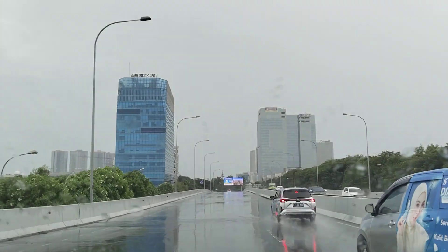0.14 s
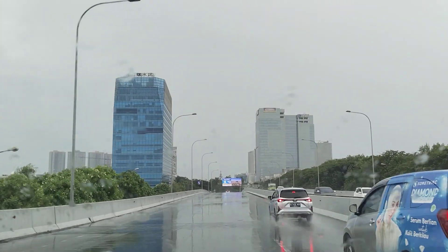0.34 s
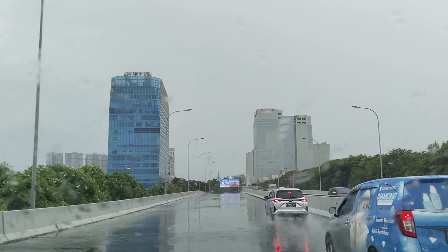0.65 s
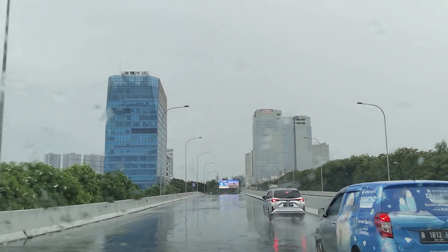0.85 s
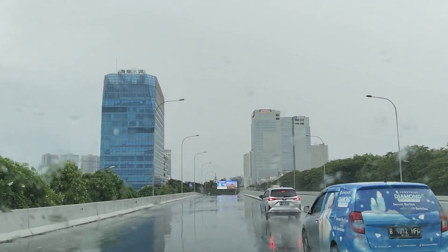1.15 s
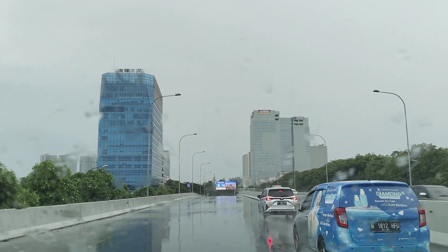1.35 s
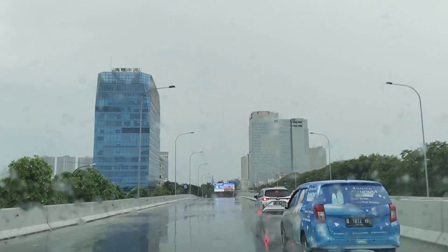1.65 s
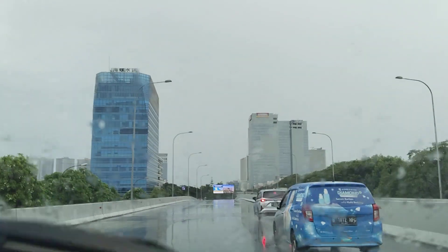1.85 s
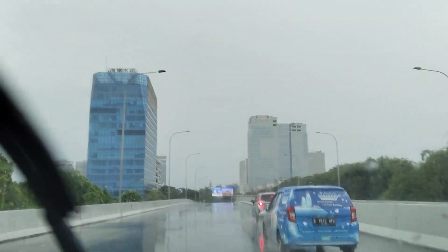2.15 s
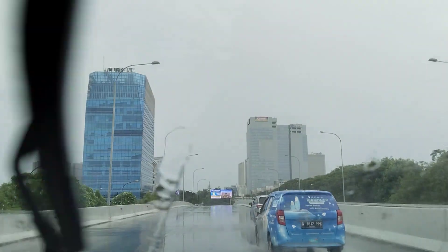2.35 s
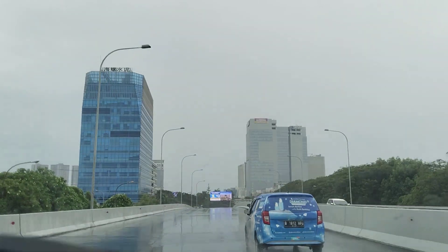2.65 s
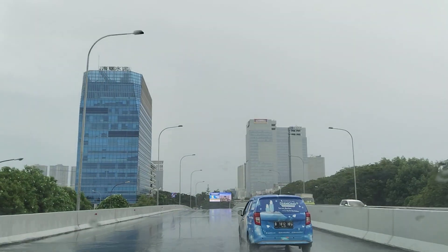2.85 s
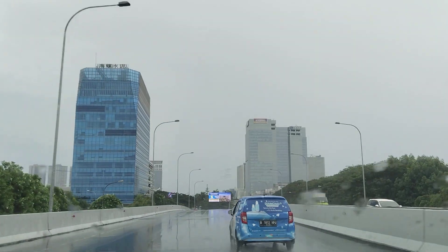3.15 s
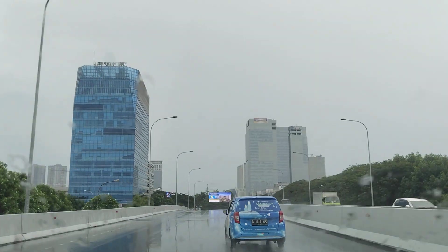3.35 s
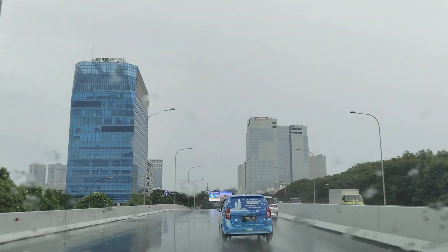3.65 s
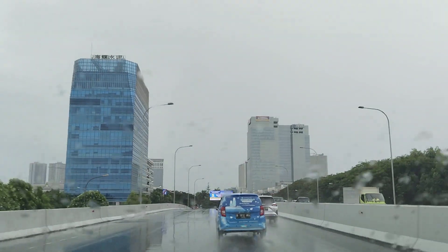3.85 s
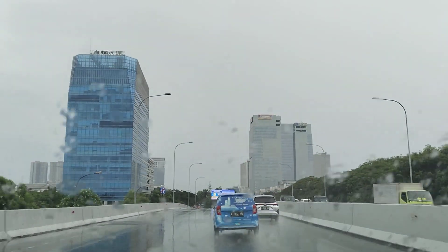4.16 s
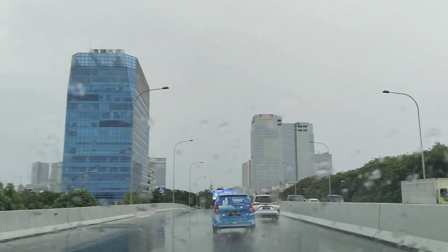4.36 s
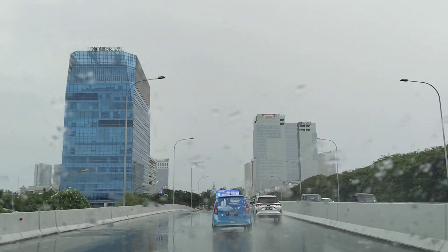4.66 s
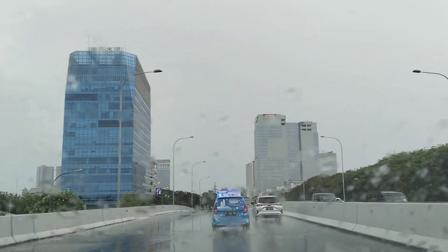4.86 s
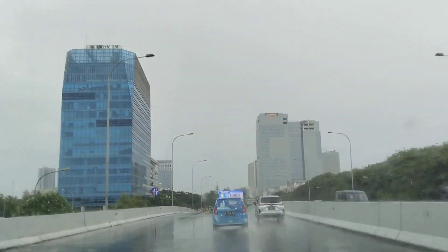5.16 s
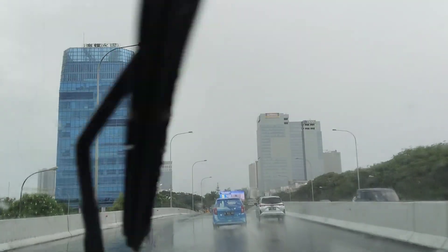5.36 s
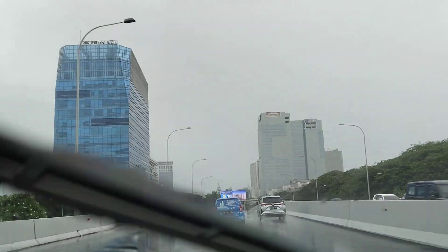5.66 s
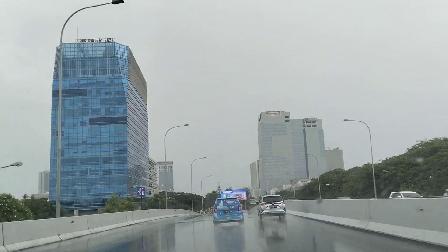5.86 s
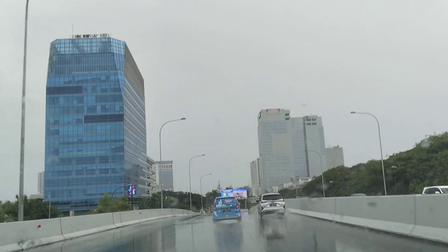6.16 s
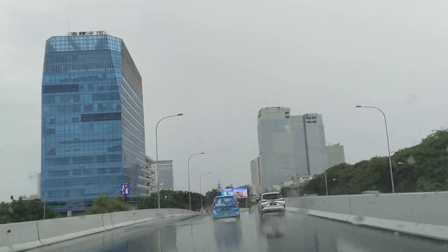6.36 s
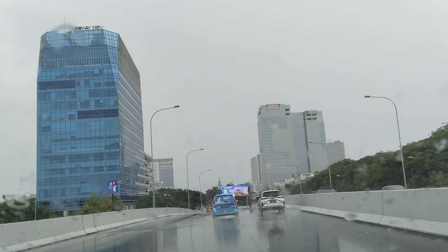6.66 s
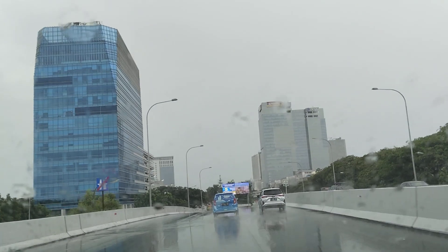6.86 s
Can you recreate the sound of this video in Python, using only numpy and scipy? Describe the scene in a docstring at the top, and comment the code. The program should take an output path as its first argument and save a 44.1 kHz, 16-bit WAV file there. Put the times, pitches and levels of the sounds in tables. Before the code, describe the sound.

Inside a moving car in the rain, a low engine drone slowly sinks in pitch beneath uneven, bassy road rumble and soft tyre roar. Fine spray hisses while sharp drops tick irregularly on the glass. Around two seconds a wiper thumps, sweeps water and squeaks briefly; near five seconds it knocks and swishes again, more softly. Water swishes over the glass at about six. Close cabin microphone, mono, with dulled top treble.

```python
"""Wet motorway from inside a car.

Engine drone: sines on a falling firing rate. Road: filtered noise in two bands, shake and roar.
Rain: spray hiss, random small drops and timed large splats, with a treble bump near 4 kHz.
Wipers and glass: thumps as decaying body modes plus rattle, sheets of water as grainy hiss,
a two-note blade squeak. Short pitched pings tick in between."""
import sys
import numpy as np
from scipy import signal
from scipy.fft import rfft, irfft
from scipy.io import wavfile

SR = 44100
rng = np.random.default_rng(int(sys.argv[2]) if len(sys.argv) > 2 else 0)


def dump(signal):
    """Clip the signal to [-1, 1] and save it as 16-bit WAV at the path in sys.argv[1]."""
    limited = np.clip(np.atleast_2d(signal).T, -1, 1)
    pcm = np.round(limited * 32767).astype(np.int16)
    wavfile.write(sys.argv[1], SR, pcm)


N = 309141

# Slowing engine: start_s, firing_rate_hz
FIRING_RATE = [(0, 62.1), (2, 60.2), (4, 57.7), (7.01, 53.6)]
# Engine, gear and tread tones: multiple_at_start, multiple_at_end (of firing rate), start_s, end_s
ENGINE_TONES = [(1, 1, 0, 2.2), (1, 1, 2.2, 4.4), (1, 1, 4.4, 7.01), (2, 2, 0, 2.2), (2, 2, 2.2, 4.8),
                (2, 2, 4.8, 7.01), (2.176, 2.176, 0, 1.75), (2.295, 2.295, 2.2, 5.5), (3.26, 3.26, 0, 6.2),
                (9.04, 9.02, 2.98, 4.8)]
# One per engine tone: rms_level_db
ENGINE_TONE_LEVELS_DB = [-35, -37, -34, -46.5, -48, -44.5, -42.5, -42.5, -51.5, -58.5]
# Road surface under the wheels: start_s, shake_db, roar_db
ROAD_LEVELS = [(0.0, -15, -34.5), (0.08, -39.5, -43), (0.3, -31, -42.5), (0.62, -38, -42),
               (1.62, -39, -41.5), (1.74, -26, -37.5), (1.97, -23, -39), (2.2, -31, -40.5),
               (2.3, -35.5, -41), (2.8, -40.5, -43.5), (3.85, -35.5, -41.5), (4.05, -28.5, -38.5),
               (4.55, -30, -42), (4.78, -41, -42.5), (4.9, -33, -41), (5.2, -38.5, -41.5),
               (5.6, -33.5, -40), (6.15, -39.5, -41), (6.45, -25.5, -39.5), (6.8, -30.5, -41),
               (7.01, -29, -41)]
# Body shake spectrum: freq_hz, density_db_per_hz
SHAKE_SPECTRUM = [(8.8, -32.5), (15, -3), (32, -4.5), (48, -0.5), (70, -10), (86, -1.5), (102, -10),
                  (130, -11.5), (174, -22), (217, -23.5), (250, -24.5), (320, -52.5), (550, -120)]
# Tyre roar spectrum: freq_hz, density_db_per_hz
ROAR_SPECTRUM = [(53, -45.5), (90, -8.5), (139, -7), (161, -7), (193, -8.5), (216, -10), (255, -11.5),
                 (433, -23.5), (534, -20.5), (766, -28), (2500, -38), (3250, -41), (5500, -120)]
# Rain strength: start_s, spray_db, small_drops_db
RAIN_LEVELS = [(0.0, -46.5, -53), (0.9, -48, -53.5), (1.5, -46.5, -52), (2.2, -46, -60), (2.95, -49.5, -55),
               (3.98, -46.5, -58), (4.67, -50, -54.5), (5.6, -50, -54.5), (6.23, -47.5, -55),
               (7.01, -49, -54.5)]
# Spray hiss spectrum: freq_hz, density_db_per_hz
SPRAY_SPECTRUM = [(530, -42), (900, -13), (1250, -7), (1400, -10), (2470, -10.5), (3260, -4.5),
                  (3700, -1.5), (4050, 2), (4260, -2), (4720, -8.5), (5740, -16), (6230, -17.5),
                  (6910, -11.5), (8930, -11.5), (9500, -10.5), (10500, -20.5), (13700, -69.5),
                  (22000, -120)]
# A drop through glass and microphone: freq_hz, density_db_per_hz
DROP_SPECTRUM = [(710, -41), (1200, -15), (1740, -18), (2230, -13), (2460, -15.5), (4130, -3), (4690, -12),
                 (5680, -15.5), (6270, -15), (7060, -9.5), (9110, -5), (9700, -8), (10500, -14),
                 (13700, -65), (22000, -120)]
# Large drops: start_s, peak_db, brightness_db
LARGE_DROPS = [(0.0219, -23, -4.5), (0.3058, -33, -8), (0.412, -26, -6), (0.4386, -23, -2),
               (0.6811, -22, -13), (0.772, -29, -21), (0.92, -24.5, -2.5), (1.0015, -30, -25),
               (1.072, -35, -6), (1.101, -26.5, -14), (1.131, -25, -9), (1.2181, -22.5, -12),
               (1.264, -25, -10), (1.326, -28, -16), (1.3766, -24.5, -6), (1.397, -25.5, -11),
               (1.444, -23.5, -7), (1.495, -37, -5), (1.513, -26, -8), (1.665, -23, -3), (1.7228, -28, -17),
               (2.0511, -25, -13), (2.088, -27, -6), (2.103, -18, 3), (2.1475, -31, 0), (2.217, -29, -20),
               (2.298, -34, -18), (2.3485, -23.5, -21), (2.376, -26, -19), (2.629, -23, -2),
               (2.711, -28, 1), (2.9348, -27.5, -22), (3.2215, -29, -13), (3.295, -28, -5), (3.315, -22, 0),
               (3.79, -25, -5), (3.9076, -23.5, -5), (4.0098, -23, -24), (4.0465, -22.5, -7),
               (4.0964, -26, -5), (4.155, -27, 0), (4.236, -25.5, -5), (4.299, -28.5, -20),
               (4.488, -25.5, -10), (4.525, -25.5, -2), (4.544, -23.5, -6), (4.666, -29.5, -9),
               (4.809, -27.5, -17), (4.8815, -28, -23), (4.89, -25, -28), (4.9942, -27, -11),
               (5.409, -28, -25), (5.5493, -27, 0), (5.648, -31, 1), (5.67, -25.5, -3), (5.722, -23.5, -16),
               (5.824, -23.5, -28), (5.9083, -37, -20), (5.9993, -33, -8), (6.0673, -23, -2.5),
               (6.094, -22, 0), (6.13, -22.5, -2), (6.19, -41, -21), (6.2156, -33, -18), (6.2567, -22, 0),
               (6.518, -25, 2), (6.574, -27.5, -3.5), (6.663, -27, -8), (6.681, -24, -15),
               (6.7054, -29, -22), (6.8285, -40, -10), (6.912, -25.5, -19)]
# Short pitched ticks: start_s, pitch_hz, peak_db, t60_s
PING_EVENTS = [(0.599, 1160, -46, 0.15), (2.143, 1850, -37, .03), (2.372, 2700, -43, 0.05),
               (2.504, 696, -34, 0.05), (3.708, 2390, -34, 0.01), (4.2415, 2030, -30, 0.011),
               (6.272, 1330, -39, 0.03), (6.7755, 1990, -33, 0.01)]
# Wiper turns and other body knocks: start_s, peak_db, brightness_db_per_octave
THUMP_EVENTS = [(1.84, -26, 0), (4.888, -30, 2), (4.8942, -28, -3), (1.926, -41, 5), (1.943, -35, -3),
                (5.529, -39, 1), (1.974, -37, -9), (2.116, -40, 1), (2.407, -40, 8), (2.465, -38, 0),
                (3.037, -42, 2), (5.494, -40, 1.5), (6.214, -34, -4), (6.305, -40, 4), (6.402, -42, 0)]
# Body modes of a thump: freq_hz, level_db, t60_share
BODY_MODES = [(80, -3, .6), (132, -6, 1.1), (162, -2, 1.1), (240, -15, .5), (320, 2, .6), (440, -17, .4),
              (545, -10, .7), (645, -11, 1.1), (820, -14, .5), (1070, -17, .4), (1280, -15, .45)]
# Water swept or thrown over the glass:
# loudest_s, rise_s, fall_s, level_db, middle_hiss_rel_db, low_rub_rel_db
WATER_SHEETS = [(2.1, 0.066, 0.054, -45.5, -5, -24), (2.16, 0.063, 0.1, -42.5, -5.5, -23),
                (2.44, 0.14, 0.12, -45.5, -11, -4.5), (2.63, 0.068, 0.11, -50.5, -6, -9.5),
                (5.04, 0.18, 0.16, -48, -10, -25), (6.1, 0.081, 0.07, -49.5, -10, -11),
                (6.145, 0.028, 0.046, -49.5, -9, -18), (6.2, 0.04, 0.044, -50, 5.5, -13),
                (6.26, 0.054, 0.084, -45, -13, -8), (6.34, 0.039, 0.08, -49, -9, -2)]
# Moving water spectrum: freq_hz, density_db_per_hz
WATER_SPECTRUM = [(400, -30), (700, -1.5), (1300, -9), (1750, 0), (2400, -10), (2730, 0), (3400, 1),
                  (4100, 2.5), (4800, -9.5), (5500, -10.5), (6200, -14.5), (6900, -6), (7600, -9),
                  (8400, -5.5), (9450, -7.5), (10500, -11.5), (13700, -48), (22000, -120)]
# Blade squeak at its turn: start_s, lower_note_db, upper_note_db
SQUEAK_LEVELS = [(2.35, -66, -66), (2.378, -53, -64), (2.398, -59, -64), (2.415, -50, -62),
                 (2.432, -49, -42.5), (2.448, -61, -58), (2.46, -51, -51), (2.476, -62, -57),
                 (2.49, -51, -62), (2.501, -51, -43), (2.514, -60, -57), (2.525, -55, -68),
                 (2.545, -68, -68)]
# Blade notes, lower then upper: pitch_hz
SQUEAK_NOTES_HZ = [1540, 1742]

LUMPS_DB, LUMPS_PER_S = 1.5, 11   # random lumps in the shake
THUMP_T60_S, THUMP_RISE_S = 0.14, 0.002
RATTLE_DB, RATTLE_T60_SHARE, RATTLE_TOP_HZ = -12, 0.7, 750
SHEET_EDGE_DB = -15   # one rise or fall time from the loudest point
SQUEAK_WAVER_SHARE, SQUEAK_FLUTTER_DB = 0.007, 1.5
CLIP_TOP, TOP_ROLLOFF_HZ, CUTOFF_HZ = 0.18, 9270, 10780


def amp(db):
    """Decibels to gain."""
    return 10 ** (np.asarray(db) / 20)


def rms_one(x):
    """Scale to rms 1."""
    return x / np.sqrt(np.mean(x ** 2) + 1e-20)


def in_time(rows, outside=None):
    """Interpolate the columns of a time table at every sample."""
    time_s, *columns = np.transpose(rows)
    t = np.arange(N) / SR
    return [np.interp(t, time_s, column, outside, outside) for column in columns]


def drift(rate_hz):
    """Random wander of rms 1: noise through two one-pole low-passes, run at SR / 40."""
    pole = np.exp(-80 * np.pi * rate_hz / SR)
    noise = rng.standard_normal(N // 40 + 2002)
    slow = signal.lfilter([1], [1, -2 * pole, pole * pole], noise)[2000:]   # drop the settling
    return np.interp(np.arange(N) / 40, np.arange(len(slow)), rms_one(slow))


def response(spectrum):
    """Minimum-phase impulse response of a spectrum, energy 1, by folding the cepstrum."""
    size = 16384
    freq_hz, db = np.transpose(spectrum)
    grid_hz = np.maximum(np.arange(size // 2 + 1) * SR / size, 1)
    grid_db = np.interp(np.log(grid_hz), np.log(freq_hz), db)
    cepstrum = irfft(np.log(amp(grid_db)))
    cepstrum[1:size // 2] *= 2
    cepstrum[size // 2 + 1:] = 0
    h = irfft(np.exp(rfft(cepstrum)))[:size // 2]
    return h / np.sqrt(np.sum(h ** 2))


def coloured(x, spectrum):
    """Filter a signal to a spectrum."""
    return signal.fftconvolve(x, response(spectrum))[:N]


def split(x, hz):
    """Low and high part of a signal, fourth-order Butterworth."""
    return [signal.sosfilt(signal.butter(4, hz, kind, fs=SR, output="sos"), x)
            for kind in ("low", "high")]


def ring(t, hz, t60_s):
    """Exponentially decaying sine, initial amplitude 1."""
    return np.sin(2 * np.pi * hz * t) * amp(-60 * t / t60_s)


def add(out, start_s, sound):
    """Mix a short sound in at a time."""
    i = round(start_s * SR)
    out[i:i + len(sound)] += sound[:N - i]


def engine():
    """Sines at multiples of the firing rate, with 0.2 s fades and slight level wander."""
    t = np.arange(N) / SR
    rate_hz = in_time(FIRING_RATE)[0]
    out = np.zeros(N)
    for (first, last, start_s, end_s), level_db in zip(ENGINE_TONES, ENGINE_TONE_LEVELS_DB):
        fade = np.clip(np.minimum(t - start_s, end_s - t) / 0.2 + 0.5, 0, 1)
        multiple = np.interp(t, [start_s, end_s], [first, last])
        phase = 2 * np.pi * np.cumsum(rate_hz * multiple) / SR
        level = amp(level_db + 0.31 * drift(0.7))
        out += fade * level * np.sqrt(2) * np.sin(phase)
    return out


def road():
    """Body shake and tread roar: two noise bands with table levels and random lumps."""
    shake_db, roar_db = in_time(ROAD_LEVELS)
    white = rng.standard_normal((2, N))
    shake_level = amp(shake_db + LUMPS_DB * drift(LUMPS_PER_S))
    roar_level = amp(roar_db + 0.86 * drift(16.0))
    shake = shake_level * rms_one(coloured(white[0], SHAKE_SPECTRUM))
    roar = roar_level * rms_one(coloured(white[1], ROAR_SPECTRUM))
    return shake + roar


def spray():
    """Fine spray: coloured noise of flickering level."""
    spray_db = in_time(RAIN_LEVELS)[0]
    hiss = rms_one(coloured(rng.standard_normal(N), SPRAY_SPECTRUM))
    return amp(spray_db + 1.25 * drift(48)) * hiss


def splats(hits, t60_s):
    """Each hit becomes a noise crackle with exponential decay."""
    fade = signal.lfilter([1], [1, -amp(-60 / (t60_s * SR))], hits + 1e-18)
    return fade * rng.standard_normal(N)


def small_drops(median_per_s=300.0, spread_db=5.5, tilt_db=5.0):
    """Random hits of many sizes and brightnesses; dull and bright parts decay apart."""
    landed = rng.random(N) < median_per_s * amp(3.0 * drift(8)) / SR
    sizes = landed * amp(spread_db * np.minimum(rng.exponential(1, N), 3.0))
    tilt = amp(tilt_db * rng.standard_normal(N))
    dull = split(splats(sizes / tilt, t60_s=0.013), 6100)[0]
    bright = split(splats(sizes * tilt, t60_s=0.0086), 5100)[1]
    level_db = in_time(RAIN_LEVELS)[1]
    return amp(level_db) * rms_one(coloured(dull + bright, DROP_SPECTRUM))


def large_drops():
    """Sharp noise splats with a weaker patter tail; the share above 5370 Hz varies per drop."""
    out, t = np.zeros(N), np.arange(900) / SR
    tick = response(DROP_SPECTRUM)[:400]
    envelope = amp(-60 * t / 0.0061) + amp(-15.5 - 60 * t / 0.1)
    envelope *= 1 - np.exp(-t / 0.00025)   # it spreads before it is loudest
    bursts = rng.standard_normal((len(LARGE_DROPS), len(t))) * envelope
    crest = 14.8   # nominal peak over rms of a splat
    for (start_s, peak_db, bright_db), burst in zip(LARGE_DROPS, bursts):
        dull, bright = split(np.convolve(burst, tick), 5370)
        share = np.clip(amp(bright_db), 0.05, 0.95)
        splat = np.sqrt(1 - share ** 2) * rms_one(dull) + share * rms_one(bright)
        add(out, start_s, amp(peak_db) / crest * splat)
    return out


def rain():
    """Spray hiss with small and large drops above it."""
    return spray() + small_drops() + large_drops()


def pings():
    """Ticks on roughly one note: decaying sines roughened by low-passed noise."""
    out, t = np.zeros(N), np.arange(SR // 6) / SR
    noise = rng.standard_normal((len(PING_EVENTS), len(t)))
    chatter = signal.lfilter([0.04], [1, -0.96], noise)
    onset = 1 - np.exp(-t / 0.001)
    for (start_s, pitch_hz, peak_db, t60_s), rough in zip(PING_EVENTS, chatter):
        tick = ring(t, pitch_hz, t60_s) * (1 + 0.35 * rms_one(rough))
        add(out, start_s, amp(peak_db) * tick * onset)
    return out


def thumps():
    """Wiper turns and knocks: body modes of random strength ring over a low-passed rattle."""
    out, t = np.zeros(N), np.arange(SR // 3) / SR
    strengths_db = rng.normal(0, 1.03, (len(THUMP_EVENTS), len(BODY_MODES)))
    noise = rng.standard_normal((len(THUMP_EVENTS), len(t)))
    rattles = signal.lfilter(*signal.butter(2, RATTLE_TOP_HZ, fs=SR), noise)
    rattle_level = amp(RATTLE_DB - 60 * t / (RATTLE_T60_SHARE * THUMP_T60_S))
    onset = 1 - np.exp(-t / THUMP_RISE_S)
    for (start_s, peak_db, tilt_db), own_db, rattle in zip(THUMP_EVENTS, strengths_db, rattles):
        body = rattle_level * rms_one(rattle)
        for (hz, mode_db, t60_share), extra_db in zip(BODY_MODES, own_db):
            level_db = mode_db + extra_db + tilt_db * np.log2(hz / 320)
            body = body + amp(level_db) * ring(t, hz, t60_share * THUMP_T60_S)
        add(out, start_s, amp(peak_db) * body * onset)
    return out


def water_sheets():
    """Water moving over glass: rub, middle and upper hiss flicker apart under swells."""
    hiss = coloured(rng.standard_normal(N), WATER_SPECTRUM)
    lower, upper = split(hiss, 5340)
    rub, middle = split(lower, 2300)
    rub, middle, upper = [rms_one(band) * amp(1.4 * drift(40) + 2.8 * drift(250))
                          for band in (rub, middle, upper)]
    out, t = np.zeros(N), np.arange(N) / SR
    for loudest_s, rise_s, fall_s, level_db, middle_db, rub_db in WATER_SHEETS:
        away = np.maximum((loudest_s - t) / rise_s, (t - loudest_s) / fall_s)
        swell = amp(level_db + SHEET_EDGE_DB * away ** 2)
        out += swell * (upper + amp(middle_db) * middle + amp(rub_db) * rub)
    return out


def squeak():
    """Rubber on glass: two sines with random pitch waver and level flutter."""
    out = np.zeros(N)
    for pitch_hz, level_db in zip(SQUEAK_NOTES_HZ, in_time(SQUEAK_LEVELS, outside=-120)):
        wavering_hz = pitch_hz * (1 + SQUEAK_WAVER_SHARE * drift(100))
        phase = 2 * np.pi * np.cumsum(wavering_hz) / SR
        level = amp(level_db + SQUEAK_FLUTTER_DB * drift(120))
        out += level * np.sqrt(2) * np.sin(phase)
    return out


def scene():
    """Sum of all sources in the cabin, one channel."""
    return (engine() + road() + rain() + pings() + thumps() + water_sheets() + squeak())[None]


def record(dry):
    """Soft-clip peaks, roll off the microphone's top, then cut it steeply."""
    soft = CLIP_TOP * np.tanh(dry / CLIP_TOP)
    rolled_off = signal.sosfilt(signal.butter(6, TOP_ROLLOFF_HZ, fs=SR, output="sos"), soft)
    steep_cut = signal.ellip(12, 0.5, 50, CUTOFF_HZ, fs=SR, output="sos")   # ripple, stopband in dB
    return signal.sosfilt(steep_cut, rolled_off)


dry = scene()
out = record(dry)
dump(out)
```